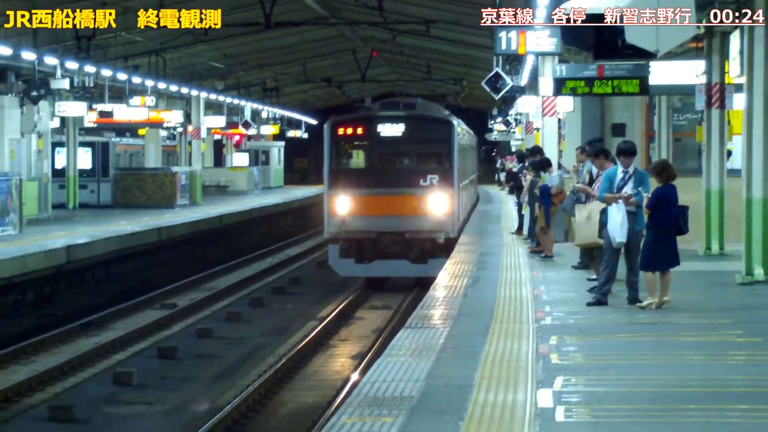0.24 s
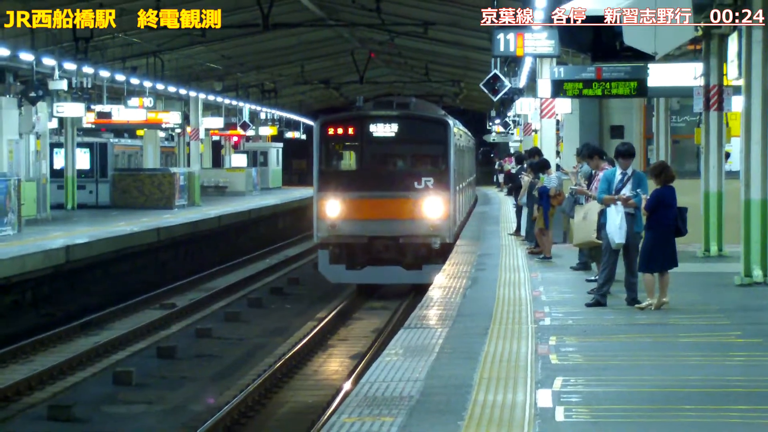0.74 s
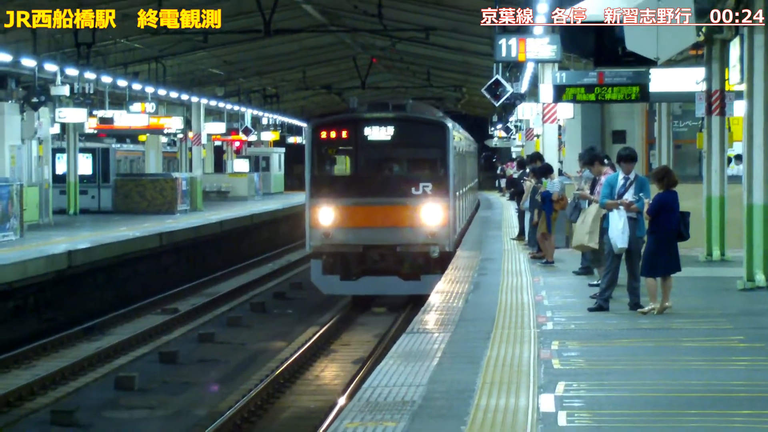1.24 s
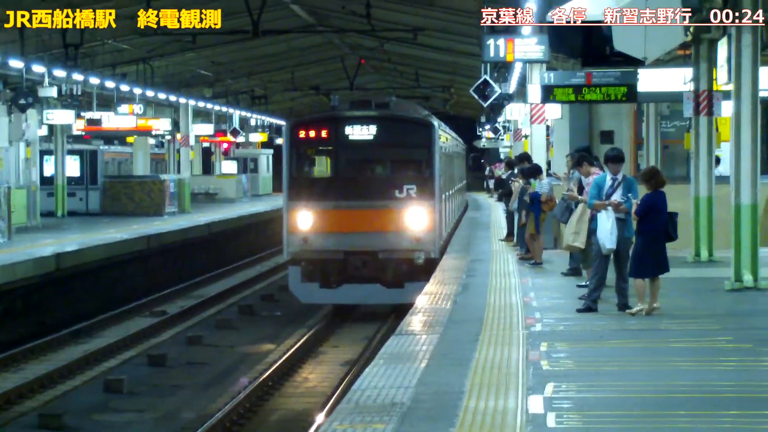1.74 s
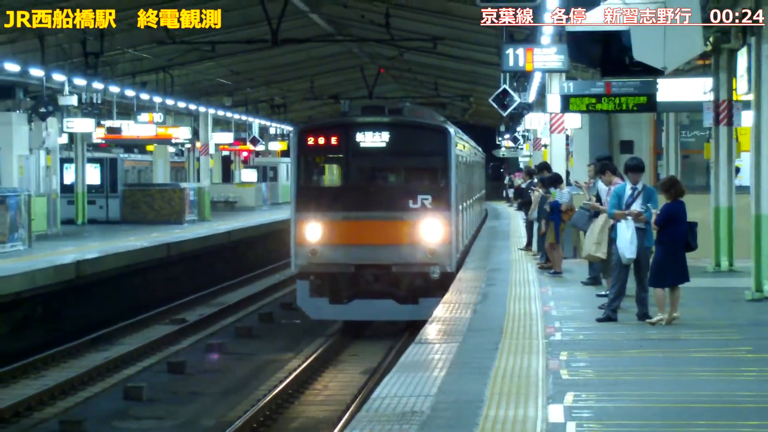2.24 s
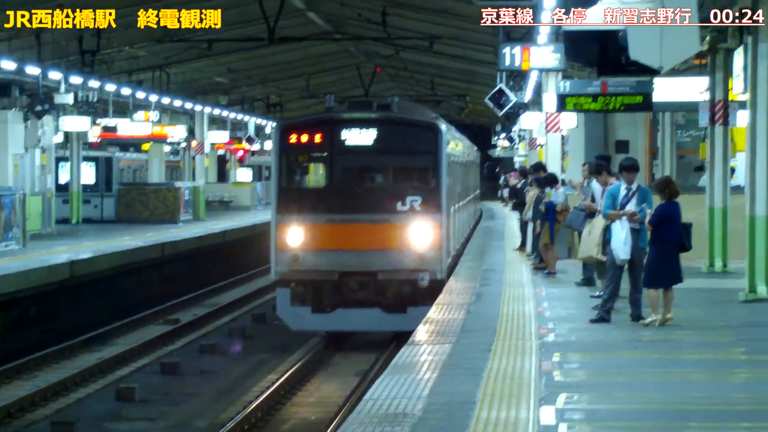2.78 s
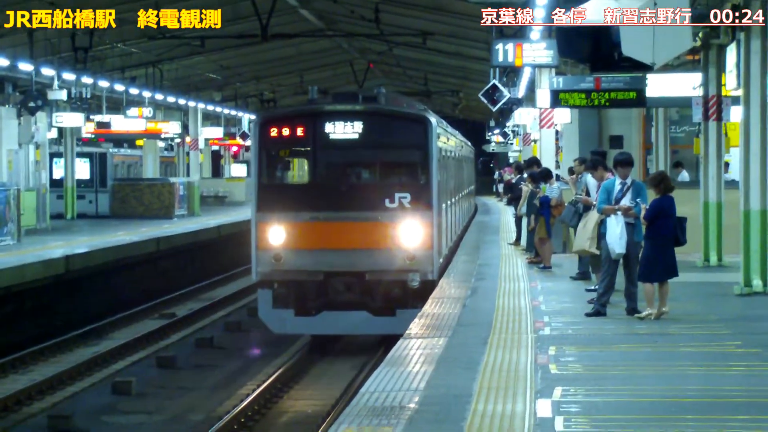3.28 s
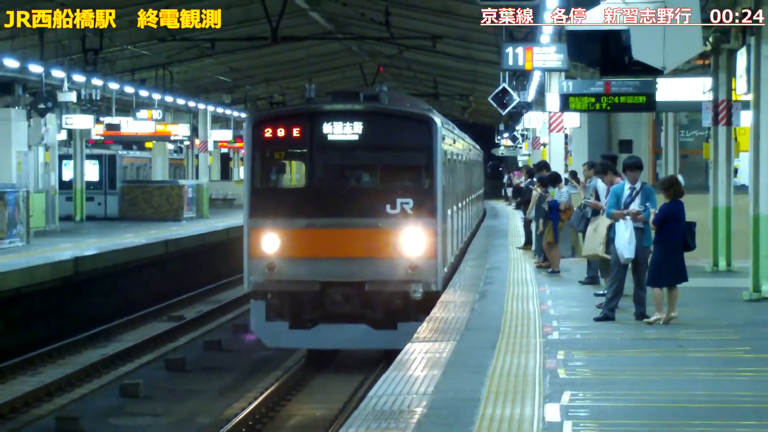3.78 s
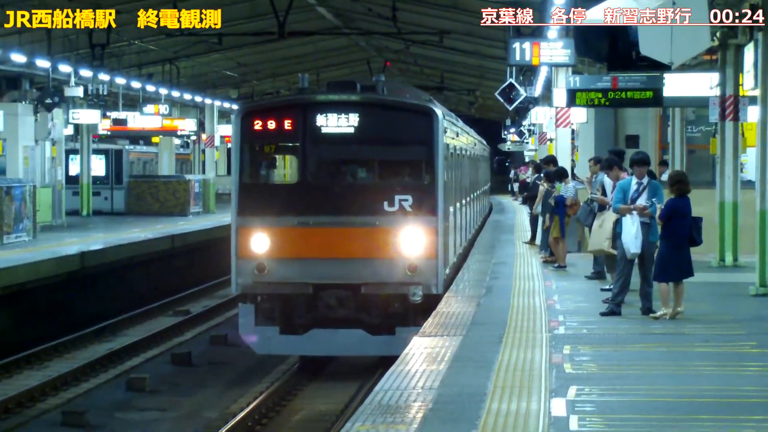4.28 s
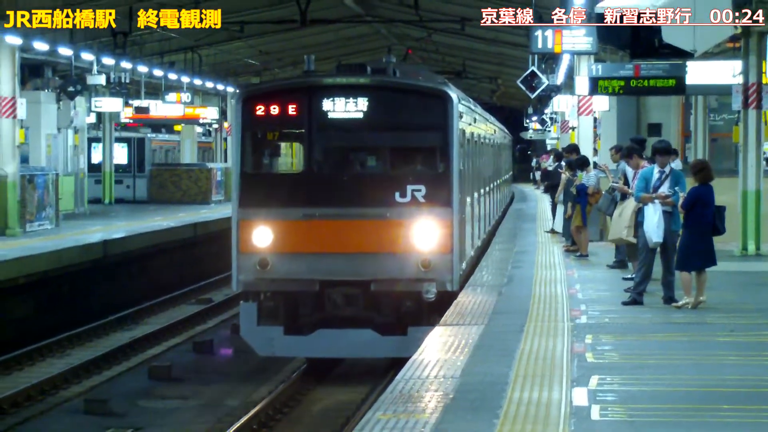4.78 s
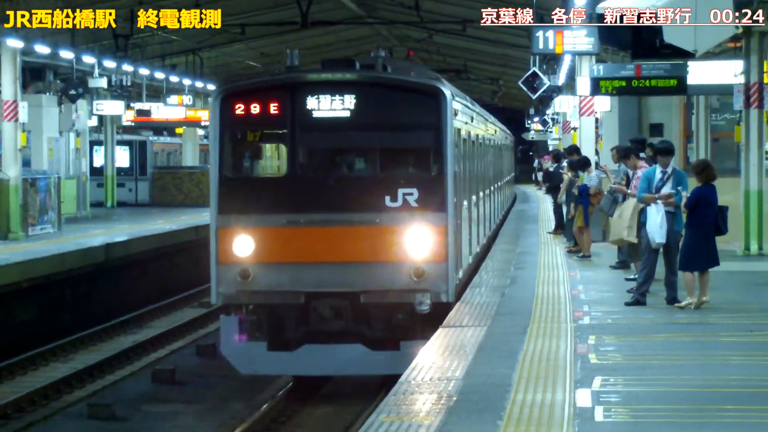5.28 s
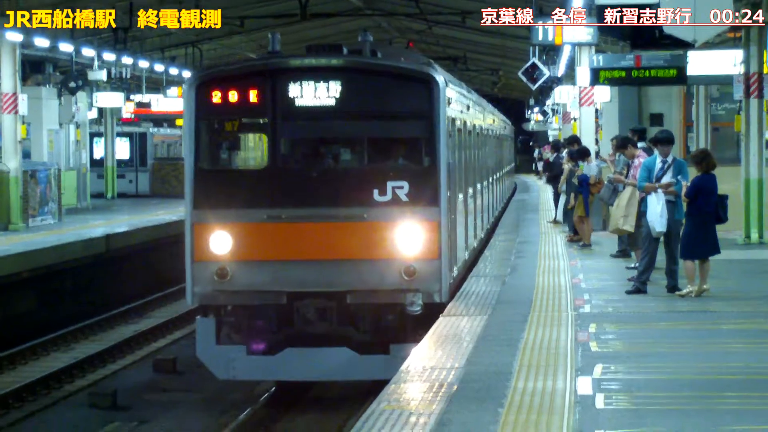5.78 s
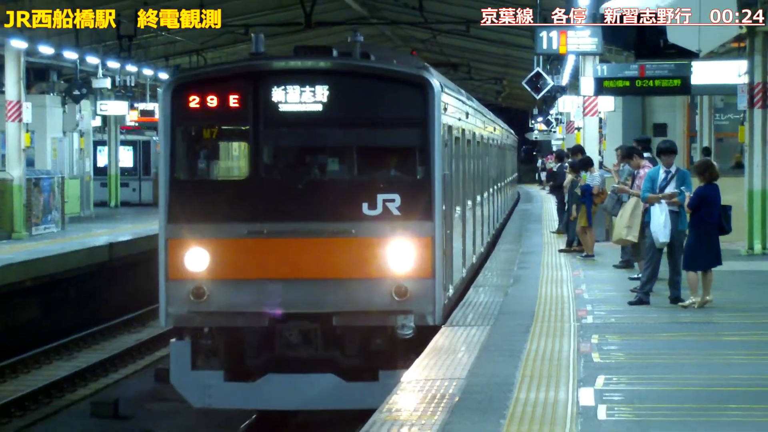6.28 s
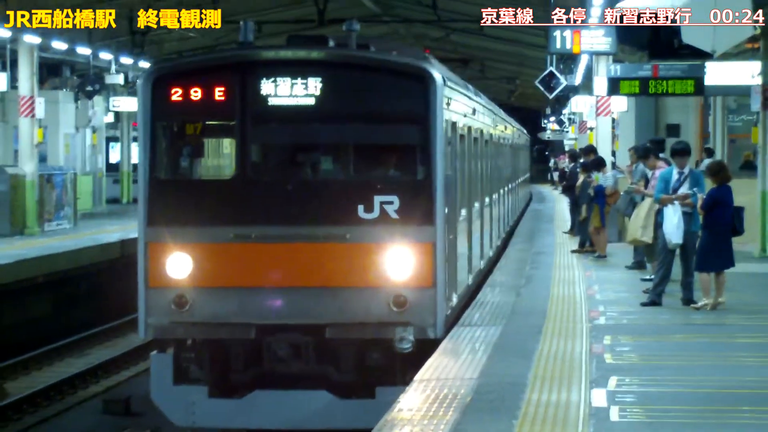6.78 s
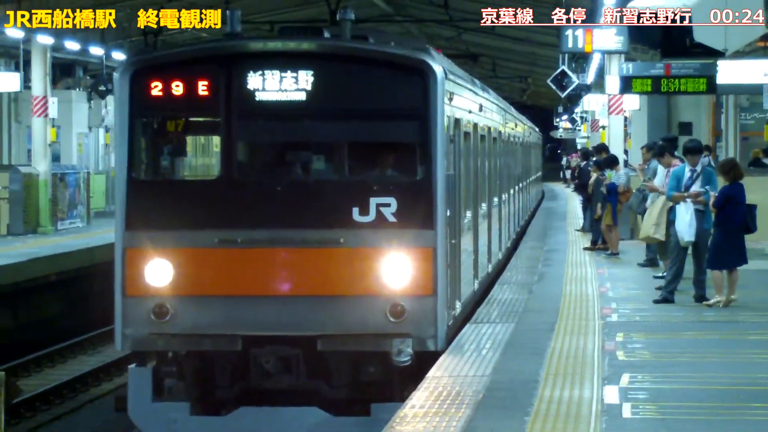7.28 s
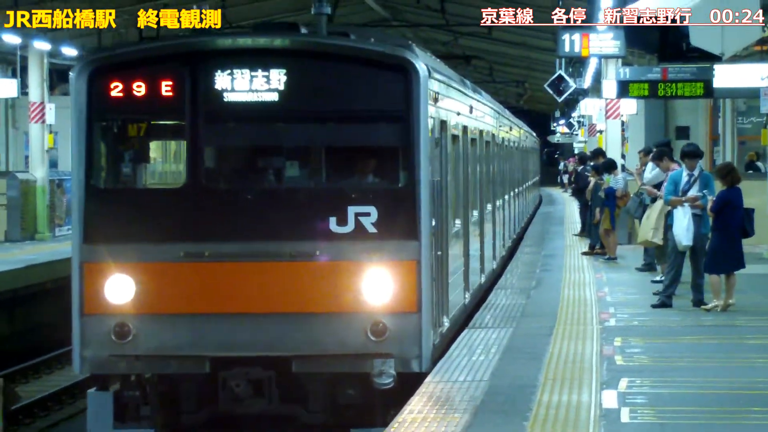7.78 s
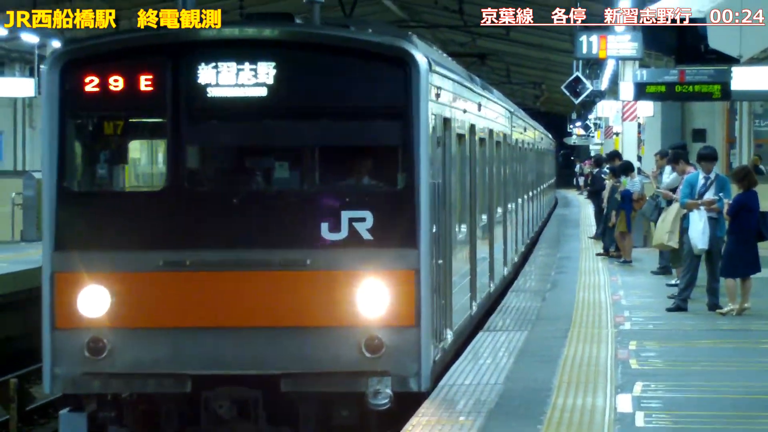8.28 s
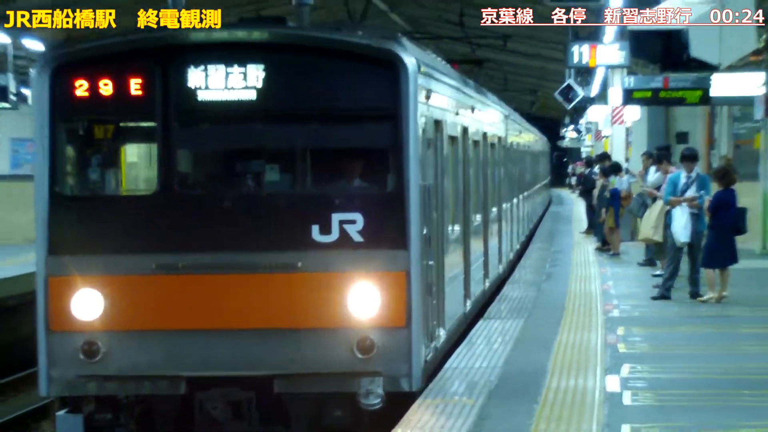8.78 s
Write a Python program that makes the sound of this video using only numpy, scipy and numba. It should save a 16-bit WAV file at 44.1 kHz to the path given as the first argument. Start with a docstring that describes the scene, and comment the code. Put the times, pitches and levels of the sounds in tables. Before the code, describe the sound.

Dry wind pops hit the microphone as a commuter train rumbles closer and slows with high, echoing brake squeals.

```python
"""An electric commuter train rolls slowly towards the listener, braking into a roofed platform.
Rolling contact makes the running gear rumble, hiss and ring, and the motor hum falls with speed.
Brake friction drives wheel modes into squeals, which the hall's echoes smear into narrow bands.
Gusts buffet the microphone with dry pops, and three times the sound cuts out for an instant.
A limiter ducks everything under the loudest peaks."""
import sys
import numpy as np
from scipy import signal
from scipy.fft import rfft, irfft, next_fast_len
from scipy.io import wavfile
from scipy.ndimage import uniform_filter1d, minimum_filter1d
from numba import njit

SR = 44100
rng = np.random.default_rng(int(sys.argv[2]) if len(sys.argv) > 2 else 0)


def to_wav(s):
    """Save 16-bit WAV."""
    ch = np.atleast_2d(s).T  # columns
    pcm = np.round(np.clip(ch, -1, 1) * 32767)  # PCM
    wavfile.write(sys.argv[1], SR, pcm.astype(np.int16))


N = 398223
TIME = np.arange(N) / SR
FREQS = np.maximum(np.arange(N // 2 + 1) * SR / N, 1)

# relative levels of the train's broadband noises: time_s, gear_db, rumble_db, hiss_db
TRAIN_LEVELS = [(0.0, -34.5, -37, -39), (0.63, -35.5, -38.5, -42), (1.03, -34.5, -38, -40),
                (4.07, -32.5, -38, -33), (5.61, -30.5, -39.5, -35.5), (6.1, -32, -40, -33.5),
                (6.79, -37.5, -43.5, -38.5), (7.34, -31.5, -38, -33), (8.22, -34.5, -40.5, -30.5),
                (8.55, -39, -42, -36), (9.03, -31.5, -38, -30.5)]
# spectral shapes of running gear, rumble and brake hiss: frequency_hz, density_db
GEAR_SPECTRUM = [(900, -5), (1300, -1.5), (1900, -1), (2350, 0.5), (2700, -0.5), (3700, -4), (4400, -0.5),
                 (5500, -13.5)]
RUMBLE_SPECTRUM = [(25, -20), (100, -19.5), (200, -9.5), (350, -4.5), (550, -6), (800, 2), (1100, -5),
                   (1500, -9.5), (2500, -15.5)]
HISS_SPECTRUM = [(2800, -8.5), (4300, 3), (5500, 4), (6800, 1.5), (7600, -2.5), (7950, -10.5), (8600, -7),
                 (10000, -17.5), (12000, -21), (15500, -18)]
# resonances of the running gear: pitch_hz, width_hz, relative_db
GEAR_MODES = [(2122, 56, -4), (3165, 98, -8.5), (4226, 43, -10.5), (8400, 180, -23)]
# electrical whistle fading under the train: time_s, level_db
WHISTLE_LEVELS = [(0, -51.5), (2.5, -51.5), (5.5, -64)]
# brake squeals, one wheel mode each: start_s, end_s, pitch_hz, level_db
WHEEL_SQUEALS = [(-.2, 0.053, 5264, -21.5), (-.2, 0.082, 5066, -22.5), (5.319, 5.47, 5500, -11.5),
                 (6.068, 7.053, 5488, -8), (6.124, 6.293, 5180, -20), (6.65, 6.833, 5130, -23),
                 (6.682, 6.957, 2745, -41), (6.957, 7.045, 5970, -21), (7.156, 7.252, 5180, -19.5),
                 (7.266, 7.533, 5295, -15), (7.557, 7.767, 5160, -11), (7.604, 7.678, 5950, -17.5),
                 (7.728, 7.968, 5536, -11), (7.723, 7.85, 4520, -23.5), (7.849, 8.261, 5204, -15.5),
                 (7.889, 7.934, 3450, -31), (7.93, 8.72, 5930, -26.5), (8.084, 8.195, 4780, -14.5),
                 (8.095, 8.238, 5000, -21.5), (7.907, 8.64, 6190, -34.5), (8.125, 8.294, 5740, -17.5),
                 (8.261, 8.808, 5482, -8.5), (8.335, 8.678, 5265, -16.5), (8.52, 8.94, 4790, -23),
                 (8.844, 9.004, 5910, -13)]
# distinct wind pops, before clipping and low cut: start_s, peak_db, length_ms
WIND_POPS = [(0.253, -7, 0.73), (0.282, -1, 1.45), (0.307, -9, 1.54), (0.566, -16, 0.93), (0.643, -14, 1.1),
             (1.024, -5, 1.06), (1.034, -6.5, 1.23), (1.275, -12, 0.76), (1.44, -6, .9), (1.45, -7.5, 1.2),
             (1.651, -3, 1), (2.032, -11.5, 1.83), (2.253, -7.5, 1.17), (2.312, -5.5, .7), (2.343, 3.5, .6),
             (2.419, -0.5, 2.94), (2.435, 0.5, 0.71), (2.575, -2.5, 1.2), (2.613, -2, 1.24),
             (2.747, -15, 1.4), (2.892, 4, 1.4), (2.901, -3, .8), (2.915, 2, 1.2), (2.955, -7.5, 1.7),
             (3.237, -13, 2), (3.314, 0, 1.5), (3.33, 4.5, 0.58), (3.861, -14, 1.86), (4.008, -12, 0.92),
             (4.694, -5, 1.585), (4.704, -8.5, 1.47), (4.797, -16, 2.6), (5.953, -19, 1.21),
             (6.107, -22, 2.2), (7.046, -14.5, 2.1), (7.128, 4, 1), (7.192, -14.5, 1.26), (7.99, -4.5, 1.8),
             (8.037, -8.5, 1.5), (8.772, -10, 0.85), (8.949, -9.5, 1.2), (8.979, -6, 1.05)]
# gusts at the microphone: centre_s, half_length_s, relative_db
WIND_GUSTS = [(0.27, 0.051, -25.5), (0.571, 0.075, -39.5), (1.039, 0.081, -30.5), (1.186, 0.066, -29),
              (1.427, 0.064, -27.5), (1.72, 0.062, -31.5), (1.994, 0.095, -33), (2.292, 0.055, -26.5),
              (2.452, .034, -26), (2.585, 0.031, -19), (2.788, 0.12, -31.5), (2.934, 0.038, -26.5),
              (3.333, .035, -24.5), (3.898, 0.15, -37), (4.697, .008, -24.5), (4.821, 0.027, -28),
              (6.54, 0.041, -35), (7.188, .07, -31.5), (8.046, .05, -26), (8.235, 0.05, -29),
              (8.922, 0.11, -35.5)]
# spectral shape of the buffeting: frequency_hz, density_db
BUFFET_SPECTRUM = [(30, -38), (80, -17), (150, -8), (280, -2), (500, 1), (800, -2), (1200, -9), (1800, -11),
                   (2800, -22), (5000, -55)]
# instants when the sound cuts out in a hard gust: centre_s, length_s
GUST_DROPOUTS = [(0.291, 0.0066), (2.334, 0.0053), (2.387, 0.012)]
# traction motor hum, steady at first, then falling with speed: time_s, pitch_hz, level_db
MOTOR_HUM = [(2.95, 370, -47), (3.5, 372.4, -54), (5.1, 375.5, -54), (5.65, 364, -47.5), (5.95, 323, -49.5),
             (6.7, 300, -56)]

APPROACH_S = (6.1, 7.47)  # the wheels come from far to near; the pairs below are (far, near)
RISE_S, HALL_T60_S, OCTAVE_DB, SQUEAL_WIDTH_HZ = (.022, .01), (1.5, 1.1), (-34.5, -22), (125, 106)


def undb(db):
    """Decibels to amplitude ratio."""
    return 10 ** (np.asarray(db) / 20)


def unit(x):
    """Normalisation to rms 1."""
    return x / np.sqrt(np.mean(np.abs(x) ** 2))


def curves(table):
    """Linear interpolation of each column to one value per sample."""
    times, *columns = np.transpose(table)
    return [np.interp(TIME, times, column) for column in columns]


def colour(x, spectrum):
    """Spectral shaping by (Hz, dB) points, rolling off beyond both ends; rms 1."""
    hz, db = np.transpose(spectrum)
    skirt = 1 / (1 + (FREQS / hz[-1] / 1.5) ** 4) / (1 + (hz[0] / FREQS / 2) ** 2)
    return unit(irfft(rfft(x) * skirt * undb(np.interp(np.log(FREQS), np.log(hz), db)), N))


def noise():
    """Gaussian white noise."""
    return rng.standard_normal(N)


def drift(rate_hz):
    """Low-passed noise gives a smooth random fluctuation; rms 1."""
    return unit(irfft(rfft(noise()) / (1 + (FREQS / rate_hz) ** 4), N))


def echo_envelope(width_hz, size=N, skirt=1.9):
    """Superposition: many echoes of a wavering tone sum to a random amplitude and phase."""
    hz = np.fft.fftfreq(next_fast_len(size), 1 / SR)
    echoes = rng.standard_normal(len(hz)) + 1j * rng.standard_normal(len(hz))
    line_shape = (1 + 3 * (hz / width_hz) ** 2 / skirt) ** -skirt
    return unit(np.fft.ifft(echoes * line_shape)[:size])


def band(hz, width_hz):
    """Random modulation broadens a tone into a narrow band; rms 1."""
    phase = 2 * np.pi * np.cumsum(hz + np.zeros(N)) / SR
    return unit(np.real(echo_envelope(width_hz, skirt=0.48) * np.exp(1j * phase)))


def rolling():
    """Forced vibration: rolling and friction excite gear noise, resonances, rumble and brake hiss."""
    gear_db, rumble_db, hiss_db = curves(TRAIN_LEVELS)
    ringing = sum(undb(db) * band(hz, width_hz) for hz, width_hz, db in GEAR_MODES)
    gear = (undb(-2) * colour(noise(), GEAR_SPECTRUM) + ringing) * undb(gear_db + .5 * drift(9))
    rumble = colour(noise(), RUMBLE_SPECTRUM) * undb(rumble_db + 0.69 * drift(6.1))
    hiss = colour(noise(), HISS_SPECTRUM) * undb(hiss_db + drift(7.4))
    return gear + rumble + hiss


def whistle(pitch_hz=8275):
    """Masking: a thin electrical tone fades beneath the noise of the train."""
    level_db, = curves(WHISTLE_LEVELS)
    return band(pitch_hz, width_hz=45) * undb(level_db)


def squeal(t, start, end, hz, db, sag_hz=44.4, even_s=0.1, octave_fade_s=1):
    """Self-excited vibration: friction builds up a wheel mode, which sags in pitch and reverberates."""
    phase = 2 * np.pi * np.cumsum(hz + sag_hz * np.interp(t, [start, end], [.5, -.5])) / SR
    # a nearer wheel gives more direct sound: a quicker onset, a shorter tail and a stronger octave
    rise_s, t60_s, octave_db, width_hz = (
        np.interp(start, APPROACH_S, pair) for pair in (RISE_S, HALL_T60_S, OCTAVE_DB, SQUEAL_WIDTH_HZ))
    swell = (1 + np.tanh((t - start - 1.23 * rise_s) / rise_s / 2)) / 2
    tail = np.exp(-np.log(1000) * np.maximum(t - end, 0) / t60_s)
    echoes = echo_envelope(width_hz, len(t))
    # the drive is steady, so the beats between echoes average out over a short time
    echoes /= np.sqrt(uniform_filter1d(np.abs(echoes) ** 2, int(even_s * SR)))
    # the octave is strongest at the onset; air absorption makes its tail die twice as fast
    octave_gain = undb(octave_db) * np.exp(-np.maximum(t - start, 0) / octave_fade_s) * tail
    octave = octave_gain * echo_envelope(2 * width_hz, len(t)) * np.exp(2j * phase)
    return np.sqrt(2) * np.real(echoes * np.exp(1j * phase) + octave) * undb(db) * swell * tail


def brakes(lead_s=.2, span_s=2.4):
    """Modal superposition: wheel modes join in one after another as the train slows."""
    out = np.zeros(N + 3 * SR)
    for start, end, hz, db in WHEEL_SQUEALS:
        span = int(max(start - lead_s, 0) * SR) + np.arange(int(span_s * SR))
        out[span] += squeal(span / SR, start, end, hz, db)
    return out[:N]


def sizzle(squeals, follow_s=0.0016):
    """Amplitude modulation: a fine, wide hiss swells and flickers with the squeals' envelope."""
    envelope = np.sqrt(np.abs(uniform_filter1d(squeals ** 2, int(follow_s * SR))))
    spectrum = [(20, -1), (100, 2.5), (1000, -0.5), (6000, -13), (10000, 4), (16000, 1.5)]
    common = noise()
    gain = envelope * undb(-26 + 0.53 * drift(70))
    return gain * np.array([colour(noise() + 0.53 * common, spectrum) for _ in range(2)])


def air():
    """Decorrelation: a faint low murmur of air sounds wide because its two channels are independent."""
    return undb(-63) * np.array([colour(noise(), [(20, 10), (70, -3), (300, -17)]) for _ in range(2)])


def pop(hz, length_ms, crack, width_cycles=0.41, edge_rise_ms=.04, edge_decay_ms=0.1):
    """Pressure transient: an eddy hits the microphone port with one sharp swing among weaker ones."""
    t = np.arange(-1024, 1024) / SR
    count = int(np.clip(np.round(2 * length_ms ** 1.5), 1, 12))
    out = 0
    for k, (when, size, pitch, angle) in enumerate(rng.standard_normal((12, 4))[:count]):
        cycles, gain = t * hz, 1
        if k > 0:  # the weaker swings scatter in time and pitch
            offset_s = np.tanh(when) * 2.1 * length_ms / 1e3
            cycles = (t - offset_s) * hz * np.exp(.3 * pitch - .22)
            gain = np.tanh(abs(size) + .5)
        envelope = gain / np.cosh(np.clip(cycles / width_cycles, -9, 9)) ** 2
        out = out + envelope * np.cos(2 * np.pi * cycles + np.pi * angle)
    edge = np.tanh(t * 1e3 / edge_rise_ms) * np.exp(-np.abs(t) * 1e3 / edge_decay_ms)
    out = out / np.abs(out).max() + crack * edge * np.sign(np.sum(out * edge))
    return out / np.abs(out).max()


def soft_pops(per_s=24, above_gust_db=13.5, scatter_db=5, typical_ms=0.99):
    """Turbulence is intermittent: each gust throws weaker pops at uneven times; rows as in WIND_POPS."""
    rows = []
    for centre_s, half_s, db in WIND_GUSTS:
        count = int(np.clip(np.round(2 * half_s * per_s), 1, 20))
        for k, (when, size, length) in enumerate(rng.uniform(-1.1, 1, (20, 3))[:count]):
            start_s = centre_s + half_s * ((2 * k + 1 + when) / count - 1)  # one per equal slot
            rows.append((start_s, db + above_gust_db + scatter_db * size, typical_ms * 2 ** (length / 2)))
    return rows


def wind_pops(pitch_at_0db_hz=1160, db_per_octave=22, low_cut_hz=270):
    """Saturation: the hardest pops flatten at the capsule's limit; the low cut thins them all."""
    margin = 1024  # half a pop, in samples
    pops = np.zeros(N + 2 * margin)
    for start_s, db, length_ms in WIND_POPS + soft_pops():
        start, peak = int(np.clip(start_s * SR, 0, N - 1)), undb(db)
        # a harder pop is higher and has a steeper edge
        hz = pitch_at_0db_hz * 2 ** (db / db_per_octave)
        crack = .3 * min(peak, 1.5) ** 3
        pops[start:start + 2 * margin] += peak * pop(hz, length_ms, crack)
    low_cut = signal.butter(2, low_cut_hz, "highpass", fs=SR, output="sos")
    return signal.sosfilt(low_cut, np.clip(pops[margin:-margin], -1, 1))


def wind_flutter(eddies_per_s=450, scatter_db=6):
    """Shot noise: small eddies strike at random, merging into a flutter that swells with each gust."""
    power = sum(undb(2 * db) * np.exp(-((TIME - centre_s) / half_s) ** 2)
                for centre_s, half_s, db in WIND_GUSTS)
    strikes = (rng.random(N) < eddies_per_s / SR) * np.sign(noise())
    eddies = strikes * undb(scatter_db * np.clip(noise(), -2, 2))
    return undb(-2) * np.sqrt(power) * colour(eddies, BUFFET_SPECTRUM)


def motor(fade_s=0.033):
    """Pitch follows rotation speed: the traction motors' hum holds, then falls as the train slows."""
    pitch_hz, level_db = curves(MOTOR_HUM)
    inside_s = np.minimum(TIME - MOTOR_HUM[0][0], MOTOR_HUM[-1][0] - TIME)
    gate = np.clip(1 + inside_s / fade_s, 0, 1)
    return band(pitch_hz, width_hz=4.9) * undb(level_db) * gate


def scene():
    """Sound pressures add: train and wind are centred; only the sizzle and the air are wide."""
    squeals = brakes()
    return air() + rolling() + motor() + whistle() + squeals + wind_pops() + wind_flutter() + sizzle(squeals)


@njit
def follow_peaks(x, release):
    """Envelope detection: instant attack, exponential release."""
    out, held = np.empty(len(x)), 0.
    for i in range(len(x)):
        held = max(x[i], held * (1 - release))
        out[i] = held
    return out


def record(dry, ceiling=.98, release_s=.015, top_hz=15800):
    """Look-ahead limiting holds the peaks; the sound cuts out for instants; a low-pass cuts the top."""
    dropouts = sum(np.exp(-np.minimum(np.abs(2 * (TIME - centre_s) / length_s), 2) ** 8)
                   for centre_s, length_s in GUST_DROPOUTS)
    peak = follow_peaks(np.abs(dry).max(axis=0), 1 / (release_s * SR))
    gain = np.minimum(1, ceiling / (peak + 1e-9))
    gain = uniform_filter1d(minimum_filter1d(gain, size=64), size=64)  # ducks just ahead of a peak
    low_pass = signal.ellip(10, .1, 70, top_hz, fs=SR, output="sos")
    return signal.sosfilt(low_pass, dry * gain * (1 - dropouts))


dry = scene()
out = record(dry)
to_wav(out)
```